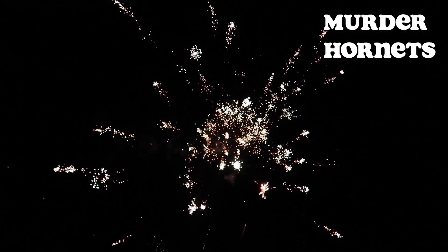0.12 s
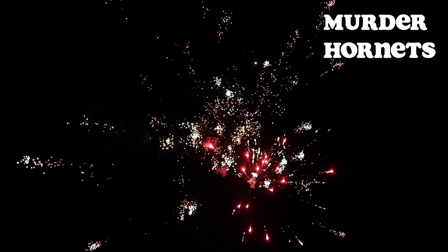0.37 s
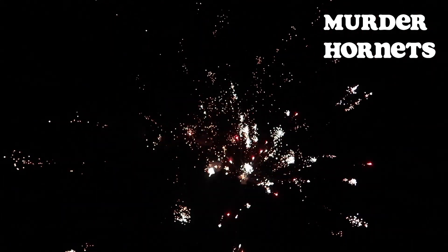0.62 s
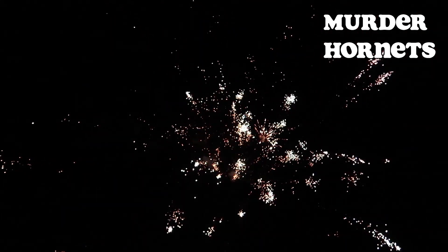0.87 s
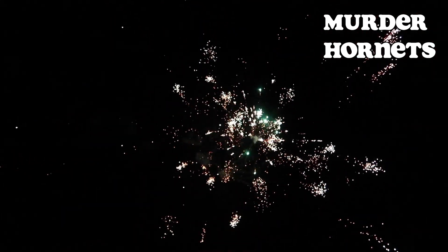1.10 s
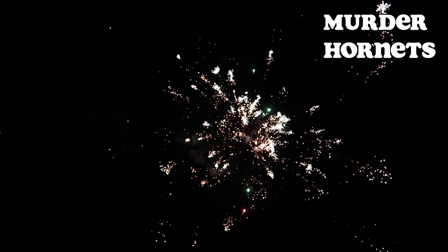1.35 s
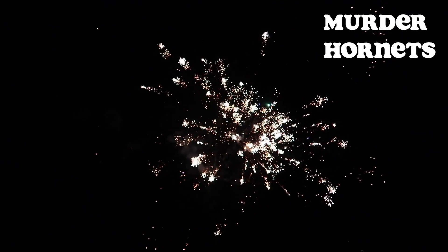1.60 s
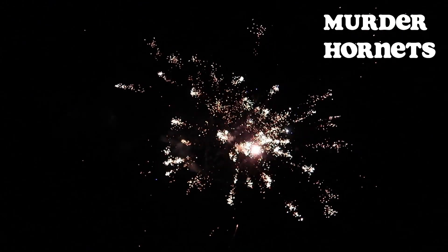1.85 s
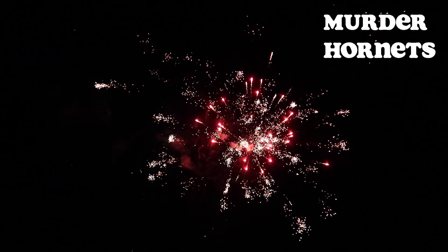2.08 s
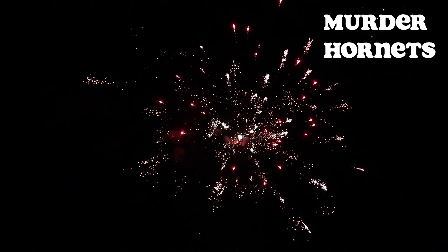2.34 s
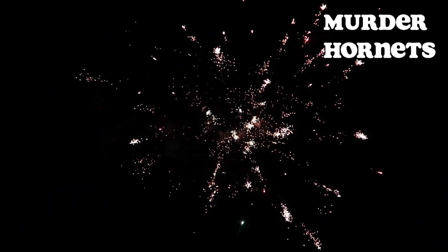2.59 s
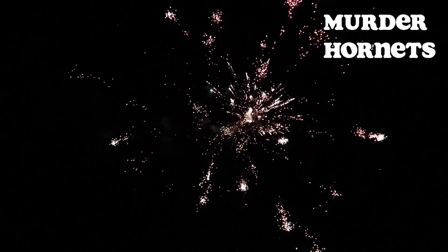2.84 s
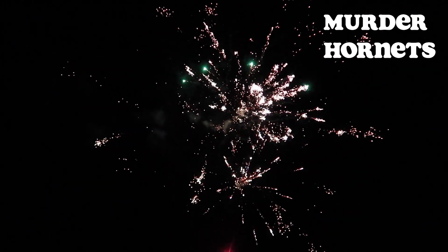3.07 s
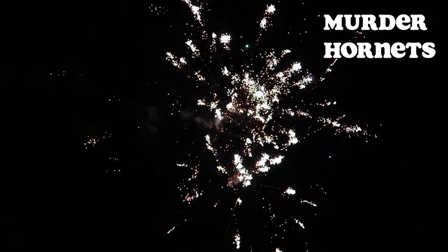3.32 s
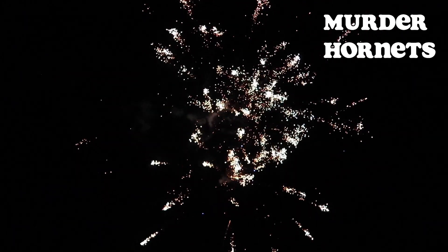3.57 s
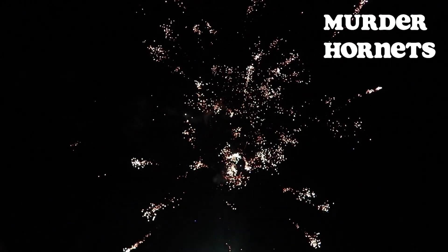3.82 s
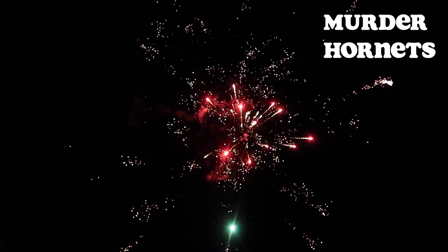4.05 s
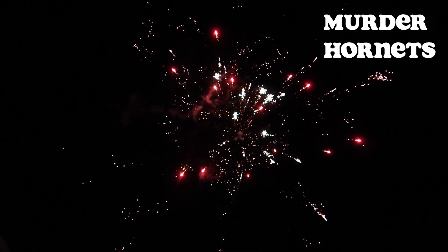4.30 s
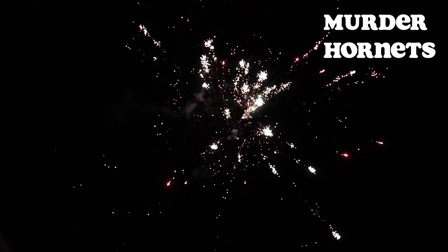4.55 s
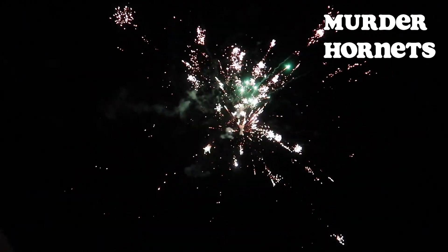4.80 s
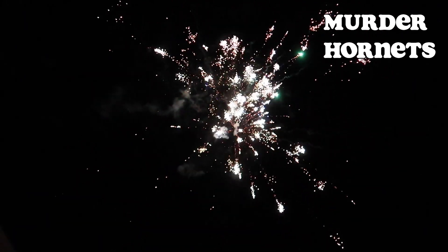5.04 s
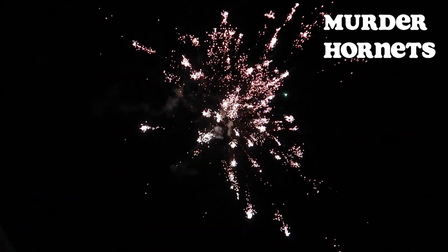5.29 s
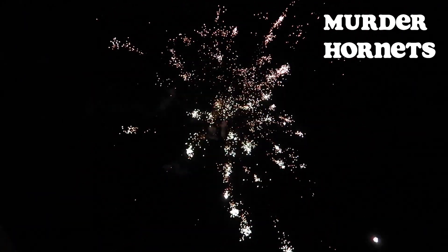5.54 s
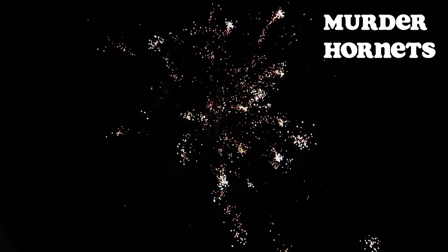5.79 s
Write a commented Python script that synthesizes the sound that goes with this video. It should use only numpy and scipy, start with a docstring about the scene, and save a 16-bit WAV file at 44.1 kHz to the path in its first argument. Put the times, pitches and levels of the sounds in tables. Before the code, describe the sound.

The fading tail of an earlier burst opens the scene, then dull launch thumps and hard overhead bangs alternate irregularly, sometimes nearly overlapping. Close walls scatter each shot for a fraction of a second, while distant buildings answer quietly. Fine wide crackle trails the bursts. After the last bang near 4.9 seconds, only decay, sparse pops and soft air remain, caught by a small, slightly overloaded stereo microphone.

```python
"""Firework shells burst loudly overhead: each is a thin crack, a pressure push and a short swing.
Soft lift charges thump from the tubes, made the same way but duller.
Ground and walls add single and scattered echoes; far buildings send back late, dull puffs of noise.
Stars crackle after each burst as tiny clicks with short tails, over the smooth noise of night air.
The loudest peaks overload a small stereo microphone."""
import sys
import numpy as np
from scipy import signal
from scipy.fft import rfft, irfft, next_fast_len
from scipy.io import wavfile
from scipy.ndimage import uniform_filter1d

SR = 44100
rng = np.random.default_rng(int(sys.argv[2]) if len(sys.argv) > 2 else 0)


def dump(signal):
    """Clip the signal to [-1, 1] and save it as 16-bit WAV at the path in sys.argv[1]."""
    limited = np.clip(np.atleast_2d(signal).T, -1, 1)
    pcm = np.round(limited * 32767).astype(np.int16)
    wavfile.write(sys.argv[1], SR, pcm)


def invert_db(x):
    """Field ratio 10**(x/20) for x, a level in decibels (scalar or array-like)."""
    u = np.asarray(x, float) / 20
    return 10 ** u


N = 260497
LEAD = SR // 2  # samples computed before time 0, so earlier bursts can still ring on


def evened(x):
    """Scales a sound to an rms of 1."""
    return x / np.sqrt(np.mean(x ** 2) + 1e-20)


def read(points, hz):
    """Reads a table of values against frequency, on a log-frequency axis."""
    f, value = np.transpose(points)
    return np.interp(np.log(hz + 1), np.log(f + 1), value)


def add(mix, s, sound):
    """Mixes the mid and side of a sound in at time s."""
    at = LEAD + round(s * SR)
    part = mix[:, at:at + sound.shape[1]]
    part += sound[:, :part.shape[1]]


def coloured(x, *spectra):
    """Makes each frequency louder or softer by the summed dB tables, with no delay."""
    hz = np.fft.rfftfreq(x.shape[-1], 1 / SR)
    gain_db = sum(read(s, hz) for s in spectra)
    return irfft(rfft(x) * invert_db(gain_db), x.shape[-1])


def dulled(x, edge_hz):
    """Takes away treble above the edge, with a second-order low-pass."""
    b, a = signal.butter(2, min(edge_hz, .45 * SR), fs=SR)
    return signal.lfilter(b, a, x)


def peaked(x, edge_hz, q):
    """Takes away treble like a damped resonance; a high q leaves a bump just under the edge."""
    w = 2 * np.pi * edge_hz
    b, a = signal.bilinear([w * w], [1, w / q, w * w], SR)
    return signal.lfilter(b, a, x)


# gain of the side signal of the microphone pair: (f/Hz, level/dB)
SIDE_GAIN = [(60, -27.5), (110, -35), (200, -37), (380, -26), (700, -23.5), (1290, -17), (2380, -11),
             (4400, -5.5), (8120, -0.5), (15000, 7)]


def widened(mid, side):
    """Stereo spread: the mid, and a side that grows toward the treble."""
    return np.array([mid, coloured(side, SIDE_GAIN)])


def clicks(shape, per_s, spread_db):
    """Sparse clicks of random sign and uneven size, a few much larger."""
    size = invert_db(spread_db * np.minimum(rng.exponential(1, shape), 4))
    sign = np.sign(rng.standard_normal(shape))
    return size * sign * (rng.random(shape) < per_s / SR)


# colour of the night air: (f/Hz, relative level/dB per Hz)
AIR_COLOUR = [(18, -43), (30, -9.5), (109, 9), (404, -4), (461, 2.5), (1280, -2.5), (3770, -11.5),
              (13300, -32.5), (16000, -52)]
AIR_DB = -57  # rms level of its mid


def night_air():
    """Smooth distant hiss and rumble: random noise filtered to a fixed colour."""
    noise = rng.standard_normal((2, next_fast_len(N)))
    mid, side = coloured(noise, AIR_COLOUR)[:, :N]
    return invert_db(AIR_DB) * widened(mid, side) / np.std(mid)


# the loudest single star crackles: (t/s, level/dB)
POPS = [(0.103, -36.5), (0.6093, -44.5), (1.3571, -35.5), (1.3785, -37.5), (3.5458, -37), (3.6405, -41),
        (4.057, -35.5), (5.23, -40), (5.5791, -42), (5.6016, -41), (5.667, -36.5), (5.8231, -38),
        (5.8424, -30)]
# colour of every star pop: (f/Hz, level/dB)
POP_COLOUR = [(300, -5.5), (1000, -1), (3000, 2), (7000, -5.5), (13000, -16), (15500, -33)]
FIZZ_PER_S = 1500  # average pops per second in the fizz
FUSE_S, FUSE_SPREAD_S = 0.7525, 0.22  # stars of a shell crackle around this long after its burst
STRAYS_DB = -77.5  # stars that crackle at any time


def crackle(mix):
    """Each star pop is a tiny blast with a short tail; many pops make a far fizz after each burst."""
    kinds = 8
    t = np.arange(2048) / SR
    tail = rng.standard_normal((kinds, 2, 2048)) * invert_db(-19 - 60 * t / .035)
    snaps = np.roll(tail + (t == 0), 64, 2)  # 64 samples of room ahead for the no-delay filter
    snaps = coloured(snaps, POP_COLOUR)
    snaps /= abs(snaps[0, 0]).max()

    trains = clicks((kinds, 1, N), FIZZ_PER_S / kinds, 4.3)
    fizz = signal.oaconvolve(trains, snaps, axes=2).sum(0)[:, :N]
    fizz = evened(fizz)
    now = np.arange(N) / SR
    power = invert_db(STRAYS_DB) ** 2
    for s, *_, fizz_db in BURSTS:
        power = power + invert_db(fizz_db) ** 2 * np.exp(-((now - s - FUSE_S) / FUSE_SPREAD_S) ** 2)
    mid, side = fizz * np.sqrt(power)
    add(mix, 0, widened(mid, side))

    for k, (s, db) in enumerate(POPS):
        mid, side = snaps[k % kinds]
        add(mix, s - 64 / SR, invert_db(db) * widened(mid, side))


# far buildings: (delay t/s, level/dB, length t/s, centre f/Hz, width f/Hz)
FAR_ECHOES = [(0.344, -49.5, .011, 594, 447), (0.468, -55, 0.062, 620, 303), (0.529, -64, 0.054, 600, 300),
              (0.619, -56, 0.0051, 604.4, 350), (0.68, -50.5, 0.0085, 559, 351)]


def far_returns(mix):
    """Each burst comes back from far buildings, dull and smeared, as narrow-band puffs of noise."""
    u = np.arange(SR // 6) / SR
    for s, db, _, return_db, _ in BURSTS:
        for late, far_db, length, centre_hz, width_hz in FAR_ECHOES:
            hiss = rng.standard_normal((len(u), 2)) @ [1, 1j]
            narrow = dulled(dulled(hiss, width_hz / 2), width_hz / 2)
            turn = np.exp(2j * np.pi * centre_hz * u)  # moves the noise up to its centre frequency
            puff = evened(np.real(turn * narrow))
            puff = puff * np.minimum(u / 0.0034, 1) * np.exp(-(u / length) ** 2)
            add(mix, s + late, invert_db(db + far_db + return_db) * np.array([puff, 0.0708 * puff]))


def blast(ring, push_s, edge_hz, crack_db):
    """A thin crack, then the pressure push of opposite sign and its dying swing."""
    t = np.arange(SR // 6) / SR
    late = np.maximum(t - .00014, 0)
    push = (1 - late / push_s) * np.exp(-late / push_s)
    swing = sum(invert_db(db - 60 * late / t60) * np.cos(2 * np.pi * hz * late) for hz, db, t60 in ring)
    body = dulled((push + swing) * (late > 0), edge_hz)
    crack = invert_db(crack_db) * np.exp(-((t - .00005) / .00007) ** 2)
    return crack - body / abs(body).max()


def echoed(pulse, echoes, jitter_s):
    """Copies of the pulse along each path; longer paths change a little from shot to shot."""
    out = np.zeros(len(pulse))
    wobbles = rng.standard_normal((len(echoes), 2))
    for (s, db, edge_hz, q), (slip, swing) in zip(echoes, wobbles):
        drift = min(s / 0.017, 1)  # 0 for the direct path, 1 for long paths
        k = max(round((s + drift * jitter_s * slip) * SR), 0)
        gain = invert_db(db + 0.69 * drift * swing)
        out[k:] += gain * peaked(pulse, edge_hz, q)[:len(pulse) - k]
    return out


def lumps(shape, depth_db):
    """Random patches in time and frequency: each object returns its own band."""
    field = rng.standard_normal(shape)
    field = uniform_filter1d(field, size=4, axis=1)
    field = uniform_filter1d(field, size=3, axis=2)
    return invert_db(depth_db * evened(field))


# how alike the scattered echoes are from shot to shot: (f/Hz, share 0-1)
REPEAT = [(100, .9), (500, .75), (1500, .5), (4000, .2), (9000, 0)]


def volley(mix, shots, pulse, echoes, colour, decay, scatter, per_s, spread_db, length_s, walls):
    """Every shot: a blast with single echoes, and scattered echoes that partly repeat."""
    scatter_db, rise_s, late_db, slower = scatter
    size = round(length_s * SR)
    t = np.arange(size) / SR
    swell_db = sum(db * np.exp(-((t - at) / half) ** 2) for at, db, half in walls)
    build = (1 - np.exp(-(t / rise_s) ** 2)) * invert_db(scatter_db + swell_db)
    shared = signal.stft(clicks((2, size), per_s, spread_db), SR, nperseg=256)[2]
    for s, db, tilt, *_ in shots:
        # mix the shared echo pattern with one that belongs to this shot alone
        hz, frame, own = signal.stft(clicks((2, size), per_s, spread_db), SR, nperseg=256)
        same = read(REPEAT, hz)[:, None]
        z = same * shared + np.sqrt(1 - same ** 2) * own

        # each frequency dies away at its own pace, with a slower tail below it
        fall_db = -60 * frame / read(decay, hz)[:, None]
        z *= invert_db(fall_db) + invert_db(late_db + fall_db / slower)
        z *= lumps(z.shape, 1.6)
        tail = signal.istft(z, SR, nperseg=256)[1][:, :size] * build

        slope = [(500, 0), (16000, tilt * np.log2(16000 / 500))]  # brightness, above 500 Hz
        padded = np.pad(tail, ((0, 0), (0, 2048)))
        tail = coloured(padded, colour, slope)[:, :size] * (t > .002)
        near = echoed(pulse, echoes, jitter_s=0.00021)
        near_side = 0.623 * signal.hilbert(near).imag  # same sound, turned a quarter cycle
        add(mix, s, invert_db(db) * widened(near, near_side))
        add(mix, s, invert_db(db) * widened(*tail))


# lift charges: (t/s, strength level/dB, scatter brightness level/dB per octave)
LIFTS = [(0.2663, -12.5, 0), (0.7746, -15.5, 0.5), (1.4284, -12, 0), (1.937, -14, 1), (2.7266, -14, 0),
         (3.2114, -14.5, 0.5), (3.6958, -12, 1.5)]
# swing after the front: (f/Hz, level/dB, 60 dB decay t/s)
LIFT_RING = [(240, 1, 0.02), (1430, -11, 0.018)]
# direct path, then single echoes: (delay t/s, level/dB, treble edge f/Hz, peak at the edge as Q)
LIFT_ECHOES = [(0, 0, 4970, .6), (.014, -4.4, 5800, 2.5), (0.0154, -13, 4020, 1.5),
               (0.025, -12.5, 1500, 1.2), (0.0349, -7.5, 1777, 1.6), (0.0375, -11.5, 1799, 1.6),
               (0.049, -13.5, 1910, 2.5), (.068, -29, 5500, 1.8), (.076, -20.5, 1490, 1.8),
               (0.103, -20.5, 3540, 1.5)]
# colour of the scattered echoes: (f/Hz, level/dB)
LIFT_COLOUR = [(24, -61.5), (40, -35), (75, -17.5), (151, -8), (249, -4), (290, -1.5), (585, -10),
               (810, -3.5), (1440, -5.5), (6650, -29), (12800, -48.5), (16000, -69)]
# how fast they die away: (f/Hz, 60 dB decay t/s)
LIFT_DECAY = [(60, 1), (200, 0.65), (600, 0.53), (1500, 0.749), (4000, 0.7), (10000, 0.48)]
# how they build up and linger: (level/dB, build-up t/s, late tail level/dB, times slower)
LIFT_SCATTER = (0, .012, -11.5, 1.68)
# groups of walls where they swell: (delay t/s, level/dB, half length t/s)
LIFT_WALLS = [(.017, 4, 0.0052), (.038, 2.5, 0.0031), (.073, 6, 0.006), (.11, 6, .014)]


def lift_charges(mix):
    """Soft thumps from the tubes: a dull push that swings, with its echoes."""
    pulse = blast(LIFT_RING, push_s=0.00054, edge_hz=1900, crack_db=-0.5)
    volley(mix, LIFTS, pulse, LIFT_ECHOES, LIFT_COLOUR, LIFT_DECAY, LIFT_SCATTER,
           per_s=5000, spread_db=3.0, length_s=0.6, walls=LIFT_WALLS)


# shell bursts, the first before time 0: (t/s, strength level/dB, scatter brightness level/dB per octave,
# far return level/dB, star fizz level/dB)
BURSTS = [(-.412, 7, 0, 0, -61.5), (.3183, 4, -0.5, 0.5, -59.5), (1.0199, 2.5, 0.5, 2, -61),
          (1.4595, 2.5, 0, 1.5, -62.5), (2.089, 5.5, 0, 3.5, -60), (2.7893, 4.5, 0, 5.5, -62.5),
          (3.0853, 5, 0, 2.5, -56.5), (4.1153, 5.5, 0, 1, -63.5), (4.6365, 3.5, 0, -4, -64.5),
          (4.8687, 1, 0.5, 5, -60.5)]
# swing after the front: (f/Hz, level/dB, 60 dB decay t/s)
BURST_RING = [(548, 4.5, 0.00989), (237.5, -12.5, 0.064), (2760, -7.5, 0.0017)]
# direct path, then ground and near walls: (delay t/s, level/dB, treble edge f/Hz, peak at the edge as Q)
BURST_ECHOES = [(0, 5, 5890, .7), (.0022, -11.5, 3000, 1), (.0078, -14, 3010, 1.6), (.0115, -18, 891, 0.8),
                (0.0216, -9, 7880, 1.5), (.0247, -15.5, 1490, 0.67), (0.0296, -14.5, 874, 0.71)]
# colour of the scattered echoes: (f/Hz, level/dB)
BURST_COLOUR = [(24, -56), (40, -26.5), (290, -5), (392, -3), (646, -2.5), (1020, -14), (1630, -17),
                (3560, -26.5), (3930, -27), (11300, -43.5), (14800, -53.5), (16000, -70.5)]
# how fast they die away: (f/Hz, 60 dB decay t/s)
BURST_DECAY = [(60, 0.48), (150, 0.34), (500, 0.28), (1500, 0.41), (4000, 0.32), (10000, 0.2)]
# how they build up and linger: (level/dB, build-up t/s, late tail level/dB, times slower)
BURST_SCATTER = (2, .0035, -24.5, 3)
# groups of walls where they swell: (delay t/s, level/dB, half length t/s)
BURST_WALLS = [(.012, 2.23, 0.0065), (.03, 1.8, .008)]


def shell_bursts(mix):
    """Loud bangs overhead: a sharp push that swings, with echoes from ground and walls."""
    pulse = blast(BURST_RING, push_s=0.00042, edge_hz=5500, crack_db=-14.0)
    volley(mix, BURSTS, pulse, BURST_ECHOES, BURST_COLOUR, BURST_DECAY, BURST_SCATTER,
           per_s=9000, spread_db=3.0, length_s=0.99, walls=BURST_WALLS)


def scene():
    """Air, crackle, far echoes, lift charges and bursts, as left and right."""
    mix = np.zeros((2, LEAD + N))
    add(mix, 0, night_air())
    crackle(mix)
    far_returns(mix)
    lift_charges(mix)
    shell_bursts(mix)
    mid, side = mix[:, LEAD:]
    return np.array([mid + side, mid - side])


def band_limit(x):
    """A steep low-pass at the top of the band."""
    return signal.sosfilt(signal.butter(12, 16540, fs=SR, output="sos"), x)


CEILING, KNEE = 1.06, 6.0  # overload level (full scale = 1), and how sharply it sets in


def record(dry):
    """The small microphone loses bass, overloads near full scale and stops at 16 kHz."""
    b, a = signal.butter(3, 48, "high", fs=SR)
    cut = signal.lfilter(b, a, dry)
    clipped = cut / (1 + abs(cut / CEILING) ** KNEE) ** (1 / KNEE)
    edge = signal.firwin(127, 16000, window=("kaiser", 8), fs=SR)
    limited = signal.oaconvolve(clipped, edge[None], "same", axes=1)
    mix = np.clip(limited, -1, 1)
    return band_limit(mix)


dry = scene()
out = record(dry)
dump(out)
```